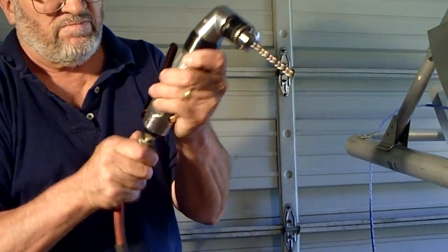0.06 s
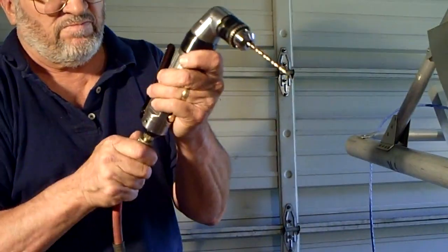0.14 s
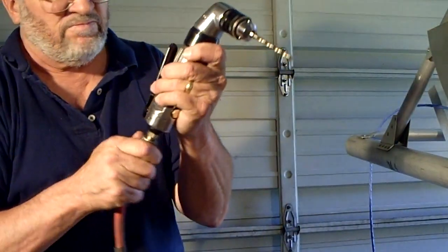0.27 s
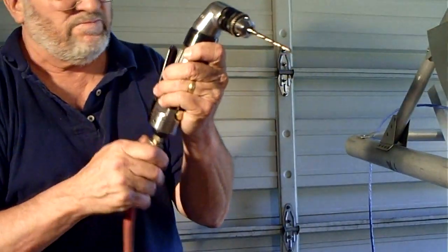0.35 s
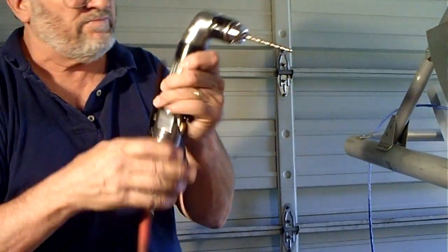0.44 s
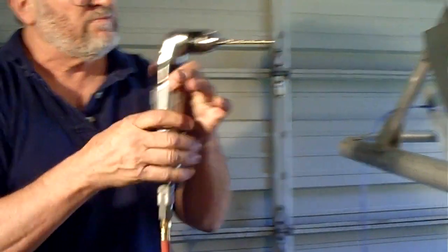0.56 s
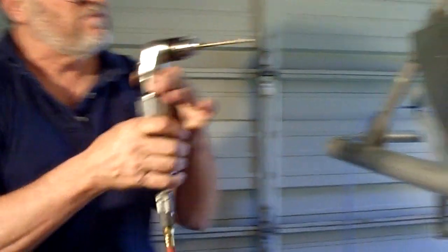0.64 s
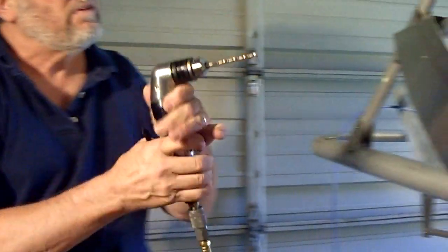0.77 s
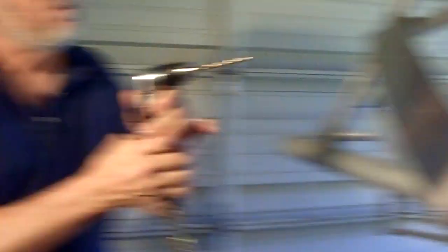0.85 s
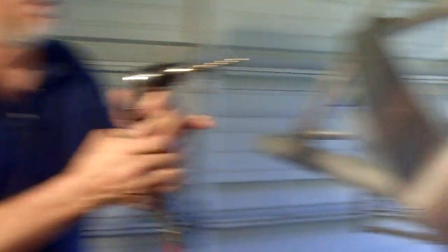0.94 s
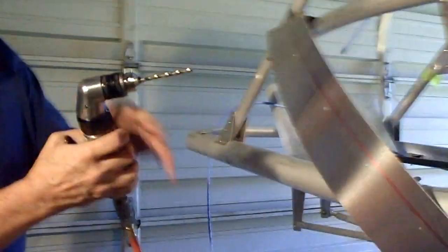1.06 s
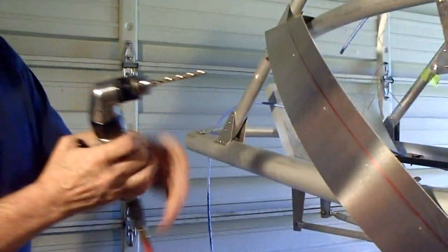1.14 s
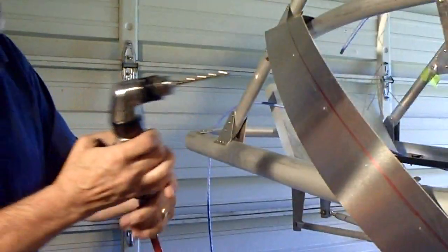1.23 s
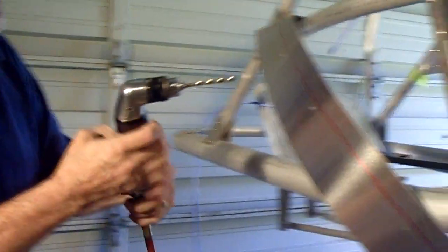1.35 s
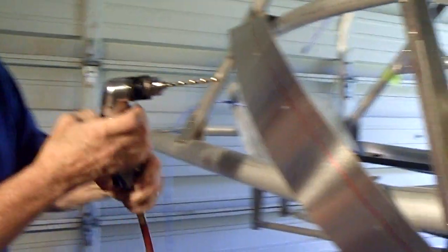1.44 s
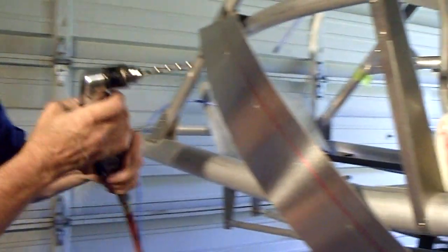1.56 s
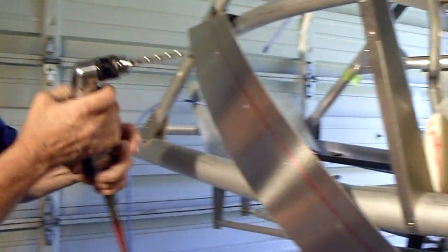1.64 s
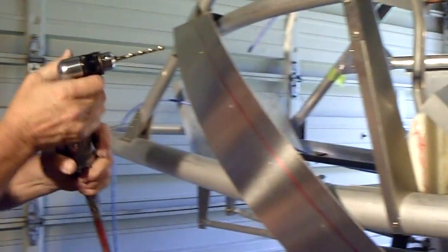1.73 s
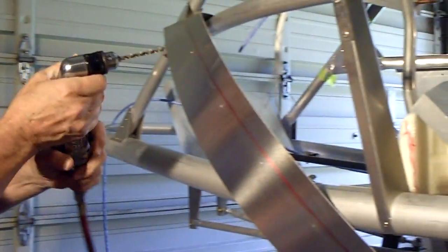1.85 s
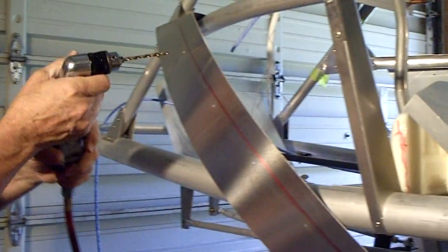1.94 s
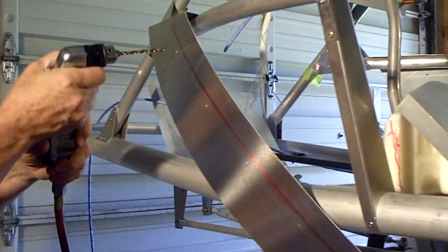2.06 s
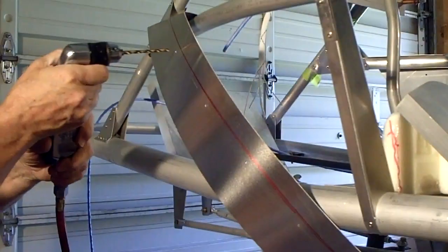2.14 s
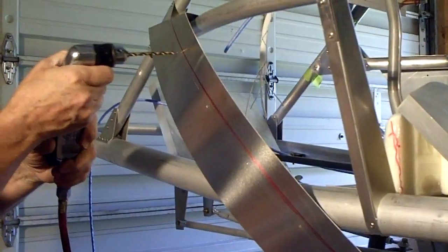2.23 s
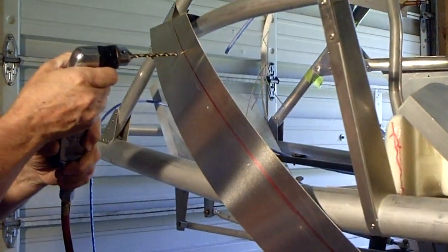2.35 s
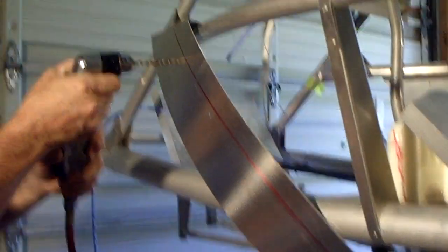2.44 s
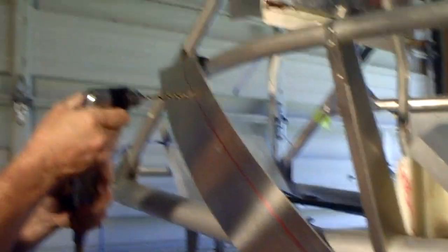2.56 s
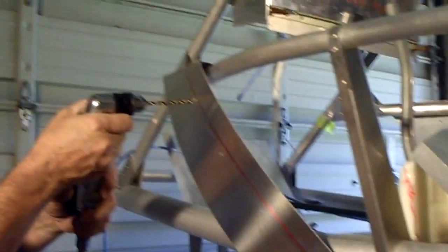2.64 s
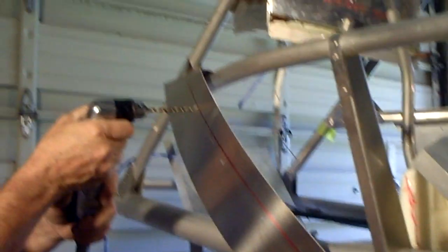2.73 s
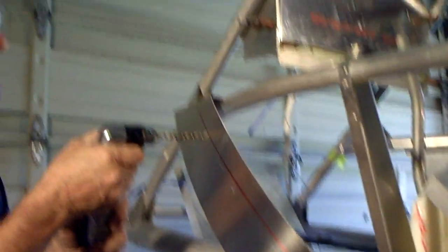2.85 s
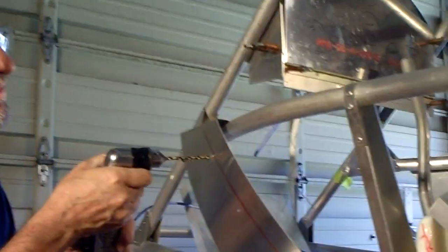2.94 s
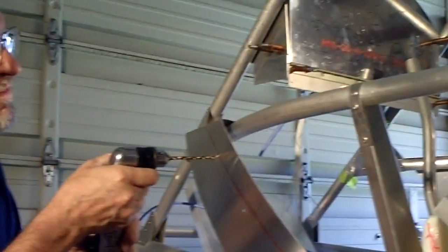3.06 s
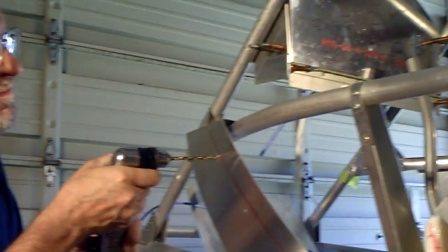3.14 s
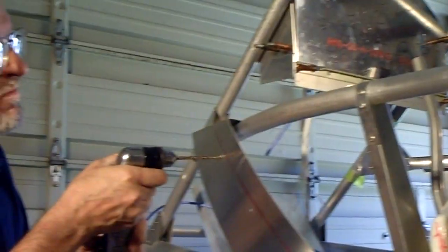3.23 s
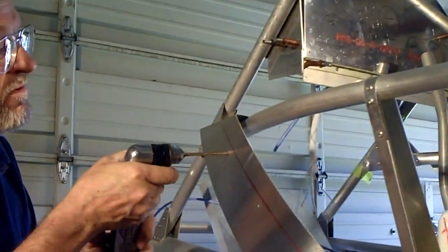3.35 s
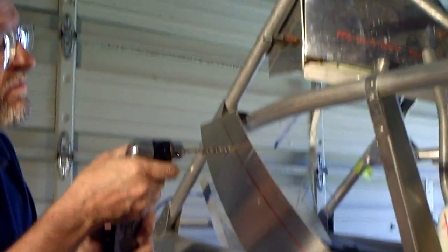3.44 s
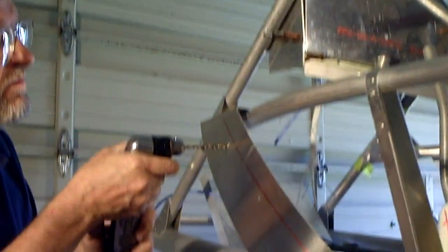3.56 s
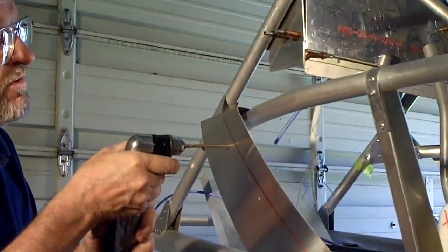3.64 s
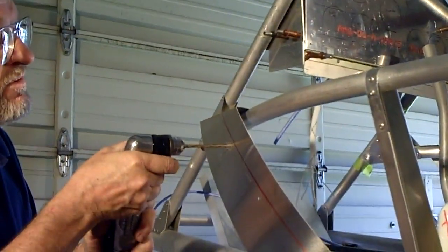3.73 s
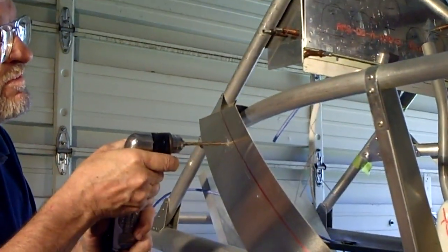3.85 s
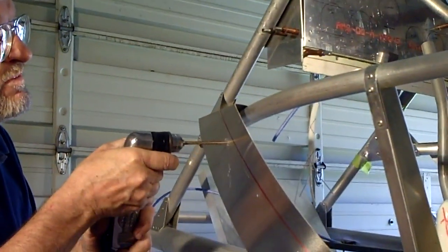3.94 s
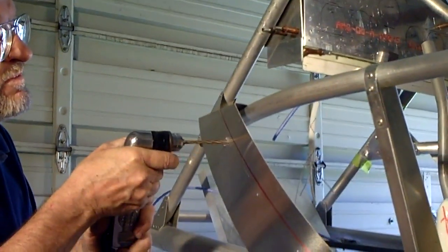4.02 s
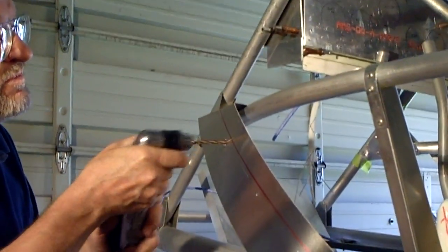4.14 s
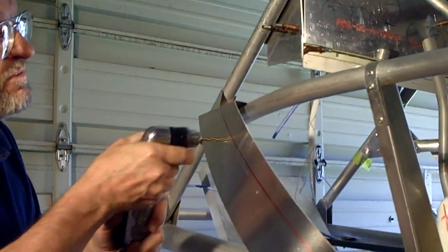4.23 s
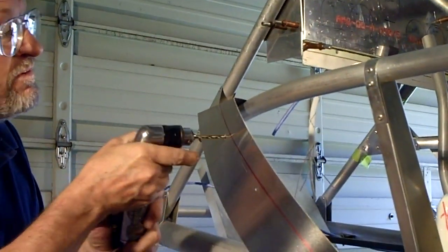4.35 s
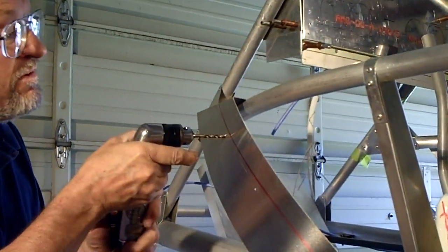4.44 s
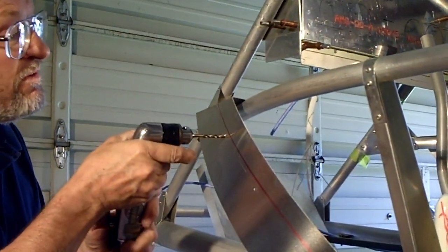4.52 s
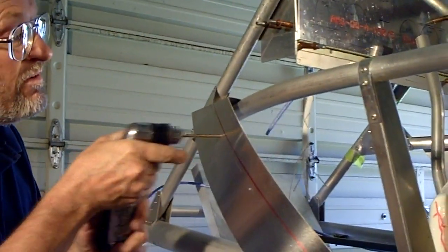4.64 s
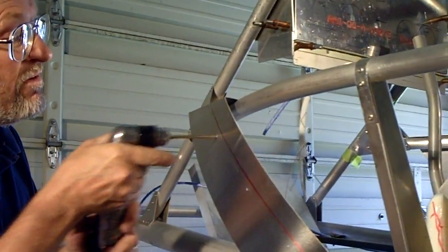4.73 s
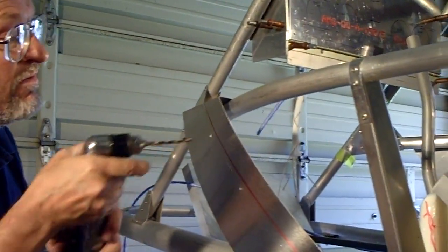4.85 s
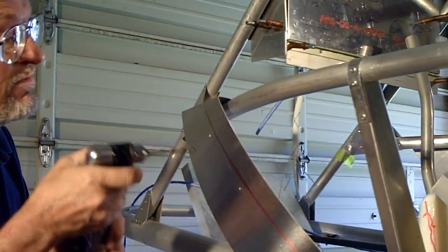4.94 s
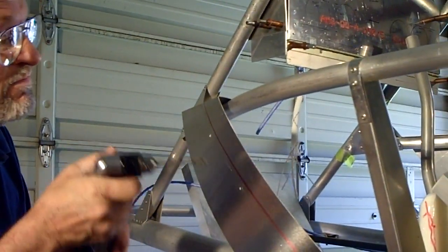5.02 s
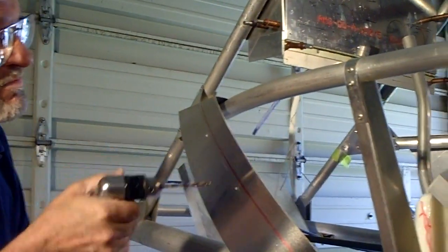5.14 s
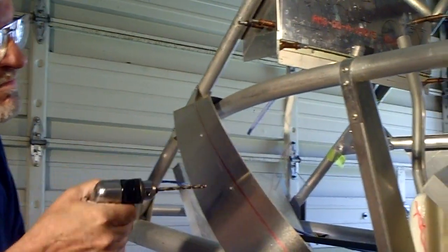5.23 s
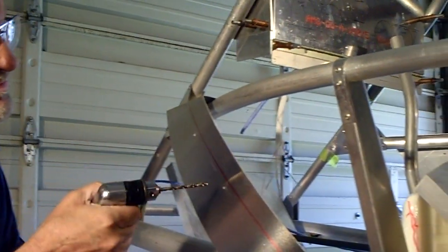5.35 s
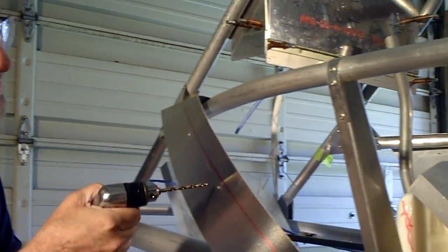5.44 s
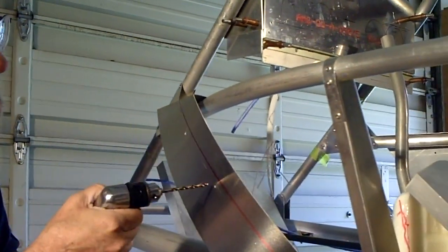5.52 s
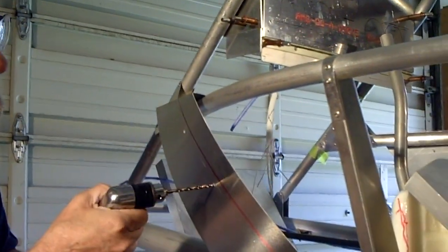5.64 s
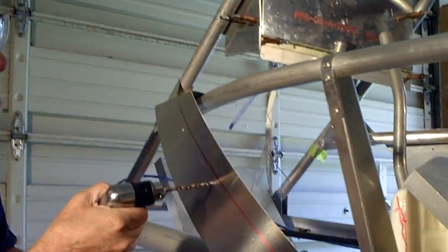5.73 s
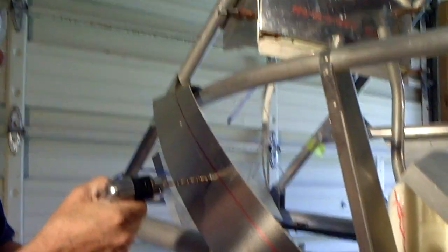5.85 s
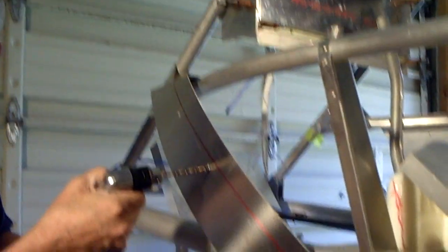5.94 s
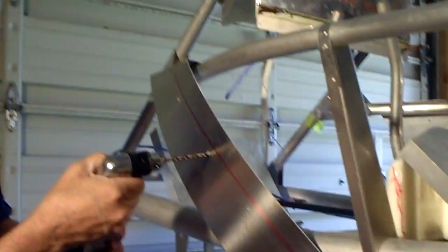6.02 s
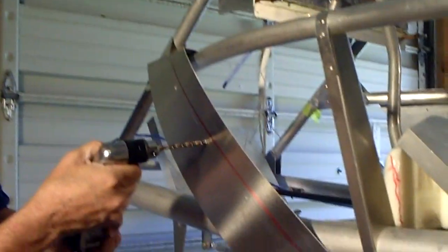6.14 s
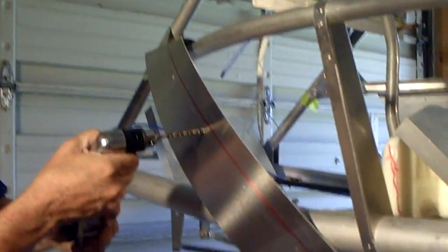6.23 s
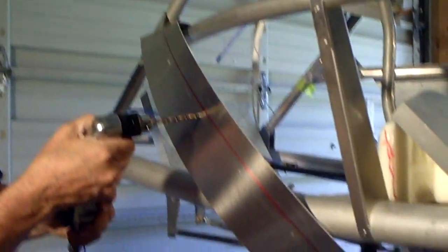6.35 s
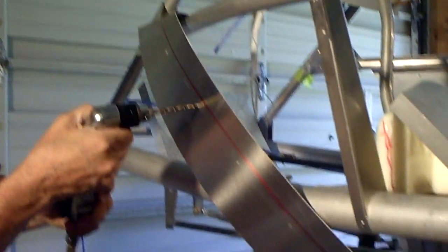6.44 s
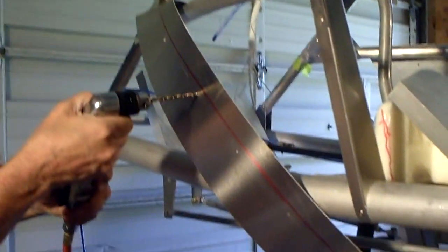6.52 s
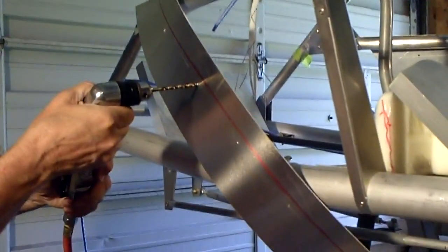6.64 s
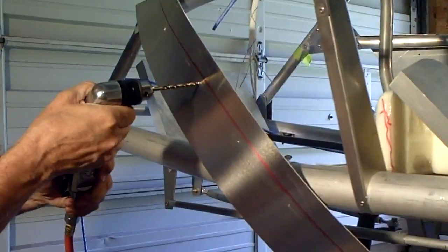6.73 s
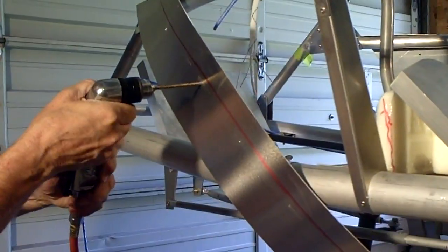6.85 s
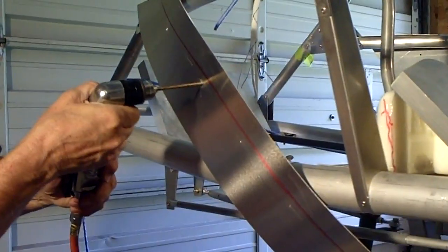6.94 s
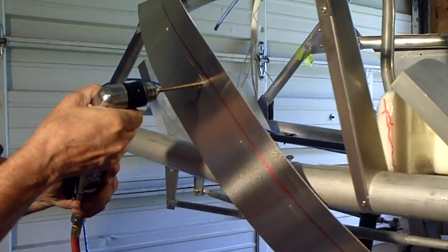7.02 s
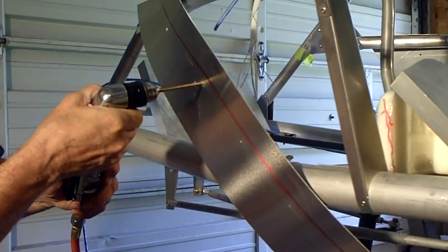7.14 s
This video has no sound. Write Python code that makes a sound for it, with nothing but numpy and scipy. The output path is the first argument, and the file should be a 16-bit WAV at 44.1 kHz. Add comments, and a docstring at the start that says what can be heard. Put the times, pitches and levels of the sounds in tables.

```python
"""A right-angle air drill, heard close in a workshop, opens up holes in an aluminium sheet in four runs.
Harmonics of one rotor whine over chopped exhaust noise, puffs through a resonant port yelp at low speed,
and the bit bumps and rubs the ringing sheet. Coloured noise blasts from the hose coupling until it seats;
knocks of the tool and soft touches of the bit on the sheet ring decaying modes.
Behind lie a faint air-line hiss, low shop noise, hum and echoes."""
import sys
import numpy as np
from scipy import signal
from scipy.fft import rfft, irfft, next_fast_len
from scipy.io import wavfile
from scipy.ndimage import uniform_filter1d

SR = 44100
rng = np.random.default_rng(int(sys.argv[2]) if len(sys.argv) > 2 else 0)


def dump(signal):
    """Clip the signal to [-1, 1] and save it as 16-bit WAV at the path in sys.argv[1]."""
    limited = np.clip(np.atleast_2d(signal).T, -1, 1)
    pcm = np.round(limited * 32767).astype(np.int16)
    wavfile.write(sys.argv[1], SR, pcm)


N = 316638
TIME = np.arange(N) / SR

# trigger pulls: air starts to leak t/s, rotor starts t/s, valve shuts t/s, settled vane rate f/Hz,
# then hiss, whine, drive of the bit's bumping, chuck wobble, each level/dB
TRIGGER_PULLS = [(3.197, 3.229, 3.416, 950, -24, -21, -32, -36),
                 (3.619, 3.634, 4.361, 920, -24.5, -21, -32, -35),
                 (4.574, 4.581, 4.772, 966, -23.5, -21.5, -32, -52),
                 (6.803, 6.819, 7.25, 959, -25.5, -21, -32, -42)]
# resonances of the exhaust passage: f/Hz, width/Hz, relative level/dB
EXHAUST_PASSAGE = [(447, 310, -8), (886, 890, -8.5), (1230, 190, -2.5), (1644, 140, -3), (3260, 310, -11.5)]
# colour of the exhaust noise: f/Hz, relative level/dB per Hz
EXHAUST_COLOUR = [(100, -22.5), (330, -6), (500, -11), (700, -3), (1000, 2), (1350, -3.5), (1650, 2.5),
                  (2300, -2.5), (3200, -3), (4600, -6), (7800, -6), (10000, -9), (11000, -21),
                  (12300, -36.5)]

NOMINAL_HZ = 1000  # vane rate that counts as speed 1
SNAG_AT_S, SNAG_LENGTH_S = 4.112, .028  # the bit snags once


def from_db(db):
    """Decibels to gain."""
    return 10 ** (np.asarray(db) / 20)


def rms_one(x):
    """Scale to unit rms."""
    return x / np.sqrt(np.mean(x ** 2) + 1e-20)


def at_hz(points, hz):
    """Read a spectrum on a log-frequency axis."""
    known_hz, values = np.transpose(points)
    return np.interp(np.log(np.maximum(hz, 1)), np.log(known_hz), values)


def noise(spectrum):
    """Noise of a given colour, rms 1."""
    size = next_fast_len(N)
    gain = from_db(at_hz(spectrum, np.fft.rfftfreq(size, 1 / SR)))
    white = rfft(rng.standard_normal(size))
    return rms_one(irfft(white * gain, size)[:N])


def drift(rate):
    """Smooth random wander, spread 1; a higher rate (Hz) wanders faster."""
    size = 2 ** 14
    hz = np.fft.rfftfreq(size, TIME[-1] / size)
    slow = rms_one(irfft(rfft(rng.standard_normal(size)) / (1 + (hz / rate) ** 2), size))
    return np.interp(TIME, np.linspace(0, TIME[-1], size), slow)


def resonate(x, resonances):
    """Parallel resonances with alternating signs."""
    out = np.zeros(N)
    for k, (hz, width, db) in enumerate(resonances):
        r = np.exp(-np.pi * width / SR)
        poles = [1, -2 * r * np.cos(2 * np.pi * hz / SR), r * r]
        ringing = signal.lfilter([1, 0, -1], poles, x + 1e-18)
        out += (-1) ** k * from_db(db) * (1 - r * r) / 2 * ringing
    return out


def low_pass(x, hz, order=2):
    """Butterworth low-pass."""
    return signal.sosfilt(signal.butter(order, min(hz, SR / 2 - 1), fs=SR, output="sos"), x + 1e-18)


def high_pass(x, hz):
    """Butterworth high-pass."""
    return signal.sosfilt(signal.butter(2, hz, "high", fs=SR, output="sos"), x + 1e-18)


def fade(start_s, decay_s):
    """Jumps to 1, then dies away."""
    return (TIME >= start_s) * np.exp(-np.clip((TIME - start_s) / decay_s, 0, 20))


def swell(middle_s, half_s):
    """Rises smoothly to 1 and falls again."""
    return np.exp(-np.minimum(((TIME - middle_s) / half_s) ** 2, 40))


def partials(turns, orders, flutter_db, flutter_rate):
    """Harmonics of a rotation, each fluttering on its own; rms 1."""
    total = np.zeros(N)
    for order, db in orders:
        level = from_db(db + flutter_db * drift(flutter_rate))
        total += level * np.sin(2 * np.pi * (round(order) * turns + rng.random()))
    return rms_one(total)


def background(shop_db=-57.5):
    """Low room noise with a hum and a thin high tone, their pitches wandering slightly."""
    # steady tones of the shop: f/Hz, rms level/dB
    shop_tones = [(58.3, -64.5), (117, -65), (233, -62.5), (291, -72.5), (425, -74), (1297, -78),
                  (7585, -76.5)]
    # colour of the room noise: f/Hz, relative level/dB per Hz
    shop_colour = [(20, -5), (55, -10), (85, -14.5), (120, -6.5), (170, -18), (250, -18.5), (400, -22),
                   (600, -26.5), (1300, -25), (2000, -31), (4000, -38.5), (7900, -37), (10000, -38.5),
                   (12300, -55)]
    hum = np.zeros(N)
    for hz, db in shop_tones:
        hum += from_db(db) * np.sqrt(2) * np.sin(2 * np.pi * np.cumsum(hz + drift(2.0)) / SR)
    return hum + from_db(shop_db) * noise(shop_colour)


def workshop(x, first_echo_s=.008, near_db=4, near_s=0.021):
    """Diffuse echoes: strong early ones from the door and frame, then a tail that dies band by band."""
    # reverberation of the room: f/Hz, t60/s
    room_decay = [(100, 0.96), (500, 0.36), (1500, 0.37), (4000, 0.5), (8000, 0.39), (12000, 0.38)]
    t = TIME[:SR * 3 // 4]
    hz, white = np.fft.rfftfreq(len(t), 1 / SR), rfft(rng.standard_normal(len(t)))
    edges = np.geomspace(40, 16000, 10)
    tail = np.zeros(len(t))
    for low, high in zip(edges, edges[1:]):
        band = irfft(white * (hz >= low) * (hz < high), len(t))
        t60 = at_hz(room_decay, np.sqrt(low * high))
        tail += band * np.exp(-np.log(1000) * t / t60)
    tail = tail * (t > first_echo_s) * from_db(near_db * np.exp(-t / near_s))
    return signal.fftconvolve(x, tail / np.linalg.norm(tail))[:N]


def jet(push_db=2, push_s=0.038, seat_at_s=.104, seal_s=0.011):
    """Flow through the open coupling, about 1, harder as the plug is pushed home, until it seats."""
    pushed = from_db(push_db * swell(seat_at_s, push_s))
    return pushed * np.exp(-np.clip((TIME - seat_at_s) / seal_s, 0, 20))


def air_line(refill_s=0.33, tool_draw=.13, hiss_db=-50):
    """The line goes on hissing faintly until the air that was drawn is replaced."""
    # resonances of the refilling line: f/Hz, width/Hz, relative level/dB
    line_resonances = [(2460, 1100, -1), (5600, 690, -2)]
    air, *_ = throttle()
    keep = np.exp(-1 / (refill_s * SR))
    deficit = signal.lfilter([1 - keep], [1, -keep], jet() + tool_draw * air)
    once = resonate(rng.standard_normal(N), line_resonances)
    hiss = rms_one(resonate(once, line_resonances))
    return from_db(hiss_db) * deficit / deficit.max() * hiss


def coupling(jet_db=-14.5):
    """A bright jet of air, cut off as the plug seats."""
    # colour of the jet: f/Hz, relative level/dB per Hz
    blast_colour = [(47, -52), (80, -15.5), (150, -10), (282, -14.5), (467, -13.5), (895, -16), (1040, -3),
                    (1250, -12), (1450, -4.5), (1910, -13.5), (8830, -1.5), (10400, -4), (12100, -29),
                    (15700, -52.5), (22000, -120)]
    return from_db(jet_db) * jet() * noise(blast_colour)


def sleeve(patchy_db=1.5, jingle_at_s=1.08, jingle_s=.025, jingle_db=-47.5):
    """The coupling's loose sleeve jingles once in the hand: patchy noise through its resonances."""
    # resonances of the sleeve: f/Hz, width/Hz, relative level/dB
    sleeve_resonances = [(3300, 330, -1), (5230, 1500, -8)]
    chatter = from_db(patchy_db * drift(200)) * rng.standard_normal(N)
    jingle = rms_one(resonate(chatter, sleeve_resonances))
    return from_db(jingle_db) * swell(jingle_at_s, jingle_s) * jingle


def handling(rattle=0.079, body_db=0.5, flicker_db=3.0):
    """Knocks and soft touches with a short rattle ring the tool-body modes; light ticks are coloured noise."""
    # dull knocks of the tool and its hose fitting, and soft touches of the bit on the sheet:
    # t/s, strength level/dB, contact decay/s
    contacts = [(.1045, -16, 0.0016), (.245, -43, 0.017), (.8185, -35.5, 0.002), (0.8908, -22, 0.0022),
                (.895, -26, 0.0093), (.9465, -22, 0.005), (1.000, -25.5, 0.0032), (1.055, -27.5, 0.0051),
                (1.2743, -21, 0.0071), (2.417, -50, 0.05), (2.852, -55, .005), (2.956, -54.5, 0.006),
                (5.857, -56.5, .01), (6.2175, -48, 0.033)]
    # modes of the tool body: f/Hz, relative level/dB, t60/s
    body_modes = [(330.8, -12, 0.046), (470.3, -9, .04), (560, -4, 0.045), (736.7, -1, 0.03),
                  (898, -6.5, 0.041), (1070, -4.5, 0.037), (1230, -8, 0.042), (1665, -17, 0.026),
                  (2199, -19.5, 0.018)]
    # light metal ticks and rubs: t/s, level/dB, decay/s
    light_touches = [(0.514, -52.5, 0.0092), (0.818, -41.5, 0.011), (0.841, -48, 0.017),
                     (.891, -43.5, 0.051), (.946, -45, .018), (1.001, -45, 0.031), (1.055, -42.5, .035),
                     (1.255, -39, 0.0046), (1.274, -33.5, 0.011), (1.732, -53.5, 0.028),
                     (1.769, -54, 0.013), (2.415, -55, .055), (5.858, -58, 0.028), (6.16, -51, 0.039),
                     (6.2165, -58, .05)]
    # colour of the ticks: f/Hz, relative level/dB per Hz
    tick_colour = [(300, 3), (600, -4), (1400, 5.5), (2200, -3.5), (3300, -4), (5000, -12), (7000, -10),
                   (10000, -13), (12300, -39)]

    contact = sum(from_db(db) * fade(s, length) for s, db, length in contacts)
    force = rattle * rng.standard_normal(N) * contact
    for s, db, _ in contacts:
        force[round(s * SR)] += from_db(db)
    ringing = np.zeros(N)
    for k, (hz, db, t60) in enumerate(body_modes):
        r, w = from_db(-60 / (t60 * SR)), 2 * np.pi * hz / SR
        poles = [1, -2 * r * np.cos(w), r * r]
        ringing += (-1) ** k * from_db(db) * signal.lfilter([0, np.sin(w)], poles, force + 1e-18)
    touches = sum(from_db(db) * fade(s, decay) for s, db, decay in light_touches)
    ticks = noise(tick_colour) * from_db(flicker_db * drift(400)) * touches
    return from_db(body_db) * ringing + ticks


def snag(recover_s=.02, drop_hz=165.08, freed_hz=45.97):
    """Change of vane rate: the snag brakes the rotor, which then recovers to a lighter load."""
    grip = np.clip((TIME - SNAG_AT_S) / SNAG_LENGTH_S, 0, 1)
    freed = 1 - np.exp(-np.maximum(TIME - SNAG_AT_S - SNAG_LENGTH_S, 0) / recover_s)
    return freed_hz * freed - drop_hz * grip * (1 - freed)


def throttle(spin_up_s=.0175, coast_s=.04, jump=.4, leak_db=-15, fill_s=0.0042, empty_s=0.033):
    """Air flow, vane rate, and when the rotor is driven or coasting, from the trigger pulls."""
    # the full hose drives the motor faster at first, then its pressure sags
    surge_hz, sag_s = 179.9, .165
    air, rate, driven, coasting = np.zeros((4, N))
    for leak, start, shut, settled_hz, *_ in TRIGGER_PULLS:
        running, closed = np.maximum(TIME - start, 0), np.maximum(TIME - shut, 0)
        seep = from_db(leak_db) * np.clip((TIME - leak) / max(start - leak, 1 / SR), 0, 1)
        filling = np.maximum(seep, 1 - np.exp(-running / fill_s))
        air += filling * np.exp(-np.minimum(closed / empty_s, 20))
        free_hz = settled_hz + surge_hz * np.exp(-running / sag_s)
        if start < SNAG_AT_S < shut:
            free_hz = free_hz + snag()
        turning = (TIME >= start) & (closed < coast_s)      # friction halts the rotor after a short coast
        spin_up = 1 - (1 - jump) * np.exp(-running / spin_up_s)
        rate += turning * free_hz * spin_up * np.exp(-closed / coast_s)
        driven += turning * (closed == 0)
        coasting += turning * (closed > 0)
    return air, rate, driven, coasting


def run_gains(whine_build_s=0.027, bump_build_s=.05, centring_s=0.24):
    """Strength of hiss, whine, bumping and wobble: two build up, the wobble dies as the bit centres."""
    leaks, starts, _, _, *levels_db = np.transpose(TRIGGER_PULLS)
    current = np.maximum(np.searchsorted(leaks, TIME) - 1, 0)
    hiss, whine, bump, wobble = from_db(levels_db)[:, current]
    running = np.maximum(TIME - starts[current], 0)
    singing = 1 - np.exp(-(running / whine_build_s) ** 2)
    leaning = 1 - np.exp(-(running / bump_build_s) ** 2)
    centred = 1 - np.exp(-(running / centring_s) ** 2)
    return hiss, whine * singing, bump * leaning, wobble * leaning * (1 - centred)


def chuff(burst_db=-17, burst_s=0.016, seep_db=-33, thin_hz=900, soft_hz=2600):
    """Air seeps through the port as the trigger is squeezed, then bursts out past the still slow vanes."""
    flow = np.zeros(N)
    for leak, start, *_ in TRIGGER_PULLS:
        squeezing = (TIME >= leak) & (TIME < start)
        flow += from_db(seep_db) * squeezing * np.clip((TIME - leak) / burst_s, 0, 1)
        flow += from_db(burst_db) * fade(start, burst_s)
    ringing = resonate(rng.standard_normal(N), EXHAUST_PASSAGE)
    return flow * rms_one(low_pass(high_pass(ringing, thin_hz), soft_hz))


def bit(load, spindle, bite=.3, judder=4.5, drum_db=2.5, wobbles_per_turn=3):
    """The bit bumps round the hole and drums the sheet, the chuck's wobble drones; the edges grab once a turn."""
    # bumping in the hole: multiple of the spindle rate, relative level/dB
    bump_orders = [(4, -5), (5, -0.5), (6, -7), (12, -6)]
    # low drum modes of the sheet: f/Hz, width/Hz, relative level/dB
    drum_modes = [(113, 18, -8), (140, 22, -7.5), (172.5, 11, -1.5), (224, 24, -9.5), (431.3, 16, -4),
                  (526.4, 30, -3)]
    # sheet resonances under the scrape: f/Hz, width/Hz, relative level/dB
    sheet_resonances = [(530, 60, -1), (880, 65, -7), (1160, 110, 2.5), (1700, 140, 0.5),
                        (2350, 370, -15.5)]
    # harder rubs where the bit leans on the rim of the hole: t/s, half length/s, level/dB
    rim_rubs = [(4.135, .025, -25.5), (4.34, .03, -23.5), (4.73, .05, -30.5), (7.13, .05, -26.5)]
    scrape_db, crunch_db = -32.5, -17.5  # light steady rub; breakthrough crunch ahead of its high-pass

    _, _, bump_gain, wobble_gain = run_gains()
    # the random judder outweighs the regular bumps
    bumps = partials(spindle, bump_orders, flutter_db=4.5, flutter_rate=24) + judder * rng.standard_normal(N)
    drumming = from_db(drum_db) * resonate(load * bump_gain * bumps, drum_modes)
    wobble = np.sqrt(2) * np.sin(2 * np.pi * wobbles_per_turn * spindle)
    drone = wobble_gain * from_db(2.5 * drift(20)) * wobble
    pressure = from_db(scrape_db) + sum(from_db(db) * swell(s, half) for s, half, db in rim_rubs)
    grab = from_db(2.0 * drift(60)) * (1 + bite * np.cos(2 * np.pi * spindle))
    scrape = pressure * rms_one(resonate(grab * rng.standard_normal(N), sheet_resonances))
    breakthrough = from_db(crunch_db) * swell(SNAG_AT_S + SNAG_LENGTH_S, half_s=0.021)
    crunch = breakthrough * grab * high_pass(noise(EXHAUST_COLOUR), hz=2000)
    return drumming + load * (drone + scrape) + crunch


def vane_yelp(turns, rate, strength, seal_hz=890, seal_width_hz=22, push=0.47, turbulence=0.035, soft_hz=2200):
    """At low speed each vane lets a strong puff through the port, which rings at harmonics sweeping by."""
    passed = np.diff(np.floor(turns), prepend=0)            # one pulse as each vane passes
    loose = 1 / (1 + np.exp(np.clip((rate - seal_hz) / seal_width_hz, -20, 20)))
    uneven = from_db(1.1 * rng.standard_normal(N))
    puffs = passed * uneven + turbulence * rng.standard_normal(N)
    size = loose * strength * (rate / seal_hz) ** push      # slower vanes push less air
    return from_db(35.5) * low_pass(resonate(puffs * size, EXHAUST_PASSAGE), soft_hz, order=3)


def motor(air, spinning, turns, chop=0.52, whine_follows=2.5, hiss_follows=3.9, least_flow=1.0):
    """Vane whine that grows with speed, over chopped exhaust hiss that grows only above nominal speed."""
    # harmonics of the whine: multiple of the vane rate, relative level/dB
    whine_orders = [(1, -1.2), (2, -9), (3, -5.5), (4, -6.5), (5, -7.2), (6, -8.2), (7, -19), (8, -16),
                    (9, -19), (10, -27)]
    hiss_gain, whine_gain, _, _ = run_gains()
    tones = partials(turns, whine_orders, flutter_db=2.4, flutter_rate=20.7)
    whine = whine_gain * spinning ** whine_follows * tones
    flow = np.maximum(spinning, least_flow) ** hiss_follows
    chopping = 1 + chop * spinning * np.cos(2 * np.pi * turns)
    hiss = hiss_gain * flow * noise(EXHAUST_COLOUR) * chopping
    return air * whine, air * hiss


def drill(jitter=.004, driven_db=-12.5, coasting_db=-6.0, thin_hz=800, spindle_turns_per_vane=.0368):
    """One rotor drives everything; returns whine, rushing and rubbing, and yelps (thinner under pressure)."""
    air, rate, driven, coasting = throttle()
    turns = np.cumsum(rate * (1 + jitter * drift(120))) / SR  # counted in vane passages
    spinning = np.maximum(uniform_filter1d(rate, size=200), 0) / NOMINAL_HZ
    whine, hiss = motor(air, spinning, turns)
    cutting = bit(air * spinning, turns * spindle_turns_per_vane)
    driven_yelp = high_pass(vane_yelp(turns, rate, from_db(driven_db) * driven), thin_hz)
    coasting_yelp = vane_yelp(turns, rate, from_db(coasting_db) * coasting)
    return whine, hiss + cutting, driven_yelp + coasting_yelp


def scene():
    """Each close source feeds the room by a share of its own."""
    whine, rush, yelps = drill()
    puffs, blast, contacts = yelps + chuff(), coupling(), handling() + sleeve()
    to_room = from_db(-10.5) * whine + from_db(-6) * rush + from_db(-8.5) * puffs
    to_room += from_db(-9.0) * blast + from_db(-9.5) * contacts
    direct = whine + rush + puffs + blast + contacts
    return (direct + workshop(to_room) + air_line() + background())[None]


def record(dry, ceiling=.78, cutoff_hz=12300):
    """The loudest peaks are rounded off and the top is cut."""
    rounded = dry / (1 + (dry / ceiling) ** 6) ** (1 / 6)
    return signal.sosfilt(signal.ellip(10, .1, 70, cutoff_hz, fs=SR, output="sos"), rounded)


dry = scene()
out = record(dry)
dump(out)
```